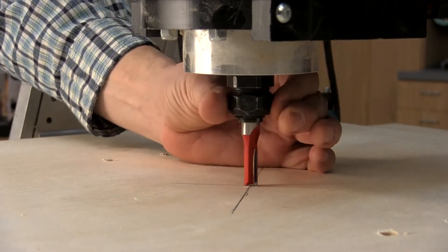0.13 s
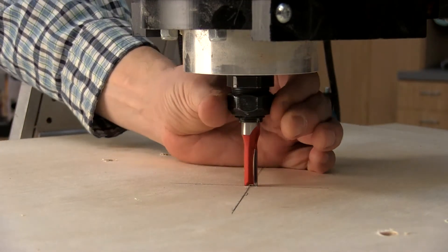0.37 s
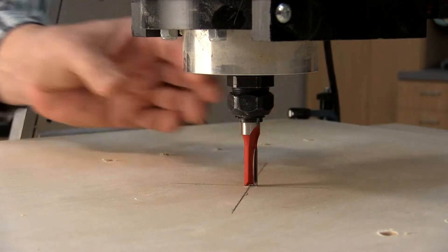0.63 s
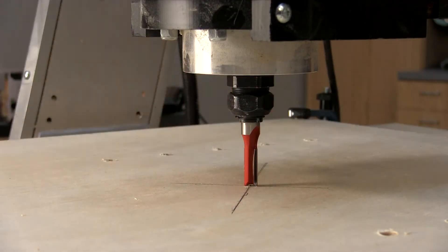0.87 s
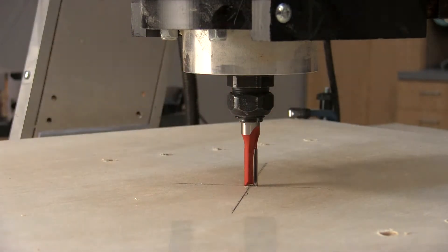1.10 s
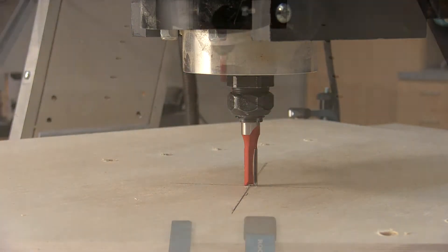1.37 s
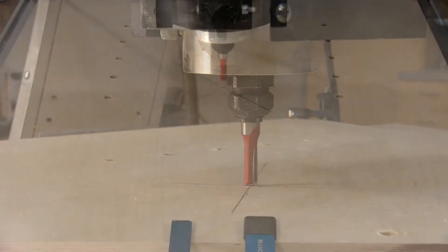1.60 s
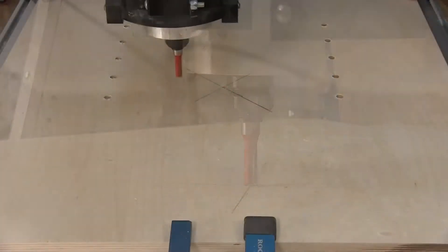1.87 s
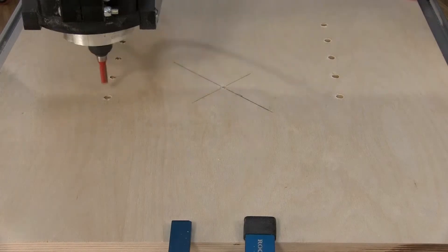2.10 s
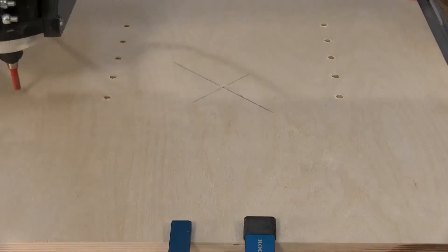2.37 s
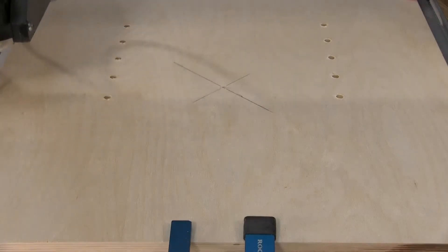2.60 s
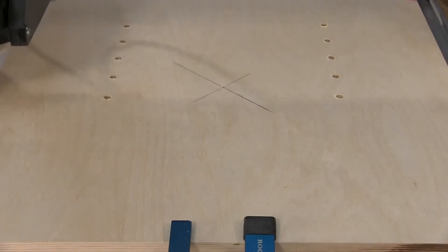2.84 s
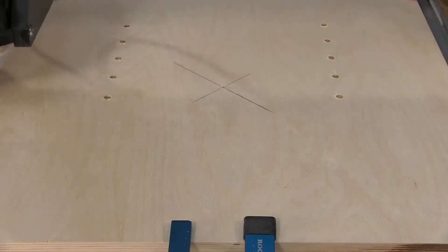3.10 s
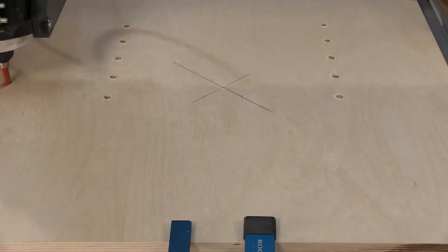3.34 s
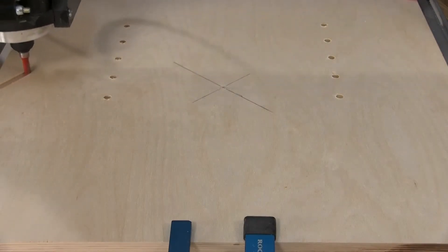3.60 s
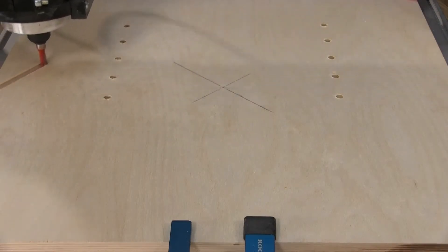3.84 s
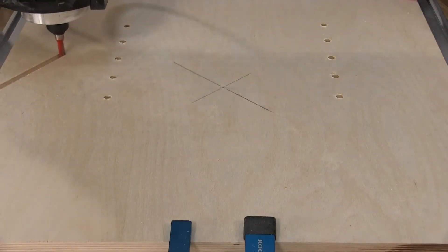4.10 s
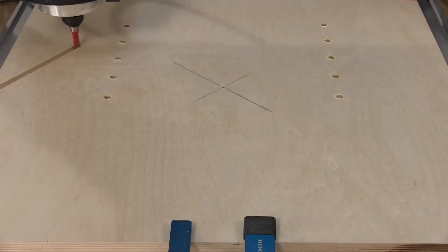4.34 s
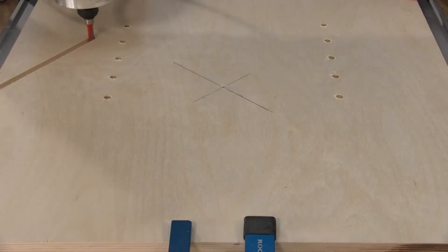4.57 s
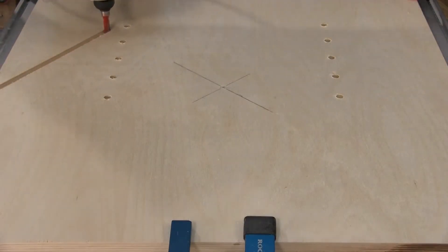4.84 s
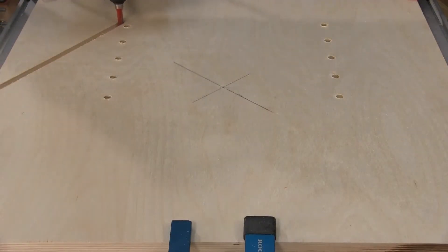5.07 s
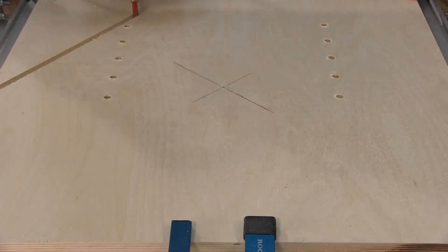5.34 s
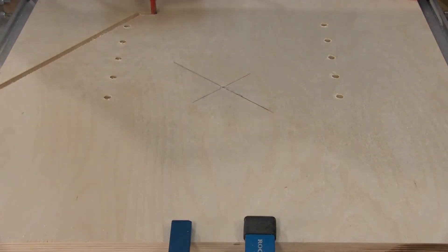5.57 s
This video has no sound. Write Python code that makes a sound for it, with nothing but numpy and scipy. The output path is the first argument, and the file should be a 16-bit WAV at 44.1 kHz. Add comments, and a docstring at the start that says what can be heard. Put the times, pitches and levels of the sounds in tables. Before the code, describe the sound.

For the first 1.55 s a workshop is nearly silent: low ventilation rumble, thin soft hiss, a faint 70 Hz hum until about 0.6 s, a tiny dry tick near 1.04 s and a weak low motor tone from 1.26 s. At 1.55 s the sound switches abruptly, with no spin-up, to a much louder router spindle: a steady piercing whine near 2.3 kHz with high overtones and airy cooling hiss. Brief stepper tones around 1 kHz sound between 1.6 and 2.5 s, others later. From 2.75 s the pitch sags, dropping faster as the bit bites plywood around 3.2 s, to about 1.7 kHz by 3.5 s. The cut is rough and dense, a metallic buzz with chip noise, throbbing near 205 Hz and a feed tone near 690 Hz, its colour shifting as the head travels. At 5.47 s one axis stops and the timbre becomes cleaner; the whine continues to the end. Close indoor stereo.

```python
"""A quiet workshop is heard first: rumble, hiss, faint hum and one tick; then the scene changes abruptly.
A router spindle, its overtones a bank of wavering sines, whines at full speed while stepper tones sound.
The bit enters plywood and the pitch sags; two feed vibrations put sidebands round the overtones.
Shaped noise makes the ventilation, cooling air and chips; jittered overtones add a dense buzz."""
import sys
import numpy as np
from scipy import signal
from scipy.fft import rfft, irfft, next_fast_len
from scipy.io import wavfile
from scipy.ndimage import uniform_filter1d

SR = 44100
rng = np.random.default_rng(int(sys.argv[2]) if len(sys.argv) > 2 else 0)


def gain_from_db(level_db):
    """Turn a decibel level (scalar or array-like) into a linear amplitude factor."""
    decades = np.asarray(level_db, float) / 20
    return 10 ** decades


def store_wav(level_fs):
    """Save 16-bit WAV to argv[1]."""
    pcm = np.round(np.clip(np.atleast_2d(level_fs), -1, 1) * 32767)
    wavfile.write(sys.argv[1], SR, pcm.T.astype(np.int16))


N = 251414  # samples
CUT, STOP = 1.5515, 5.47  # change of scene, slow axis stops (s)
END = 9  # a gate closing here (s) stays open to the last sample
LEFT_RIGHT = np.array([[1], [-1]])  # sign of the side signal at each microphone


def along(points, hz):
    """Gain at hz from (Hz, dB) points joined on a log frequency axis."""
    f, db = np.transpose(points)
    return gain_from_db(np.interp(np.log(hz + 1), np.log(f + 1), db))


def curves(rows):
    """One value per sample for each column after the time."""
    s, *columns = np.transpose(rows)
    t = np.arange(N) / SR
    return [np.interp(t, s, column) for column in columns]


def wobble(rate):
    """A random curve with rate knots a second."""
    knots = rng.standard_normal(int(N * rate / SR) + 4)
    return np.interp(np.arange(N) * (rate / SR), np.arange(len(knots)), knots)


def gate(start, stop, edge):
    """1 between two times, with ramps of edge seconds inside them."""
    t = np.arange(N) / SR
    return np.clip(np.minimum(t - start, stop - t) / edge, 0, 1)


def turns(hz):
    """Running phase of a changing frequency, in radians."""
    return 2 * np.pi * np.cumsum(hz * np.ones(N)) / SR


# The bass is nearly alike at both microphones.
# Each row: frequency in Hz, gain of the side signal in dB.
SIDE_COLOUR = [(70, -12), (300, -1.5)]


def rush(gain, side_db, patchy_db, source=None):
    """Colours a mid and side source (noise if none) with random patches of gain; its mid has rms 1."""
    if source is None:
        source = rng.standard_normal((2, N))
    hz, _, z = signal.stft(source, SR, nperseg=2048)
    field = rng.standard_normal(z.shape[1:])
    field = uniform_filter1d(uniform_filter1d(field, 14, axis=0), 3, axis=1)
    colour = gain(hz) * [np.ones_like(hz), along(SIDE_COLOUR, hz)]
    z = z * colour[..., None] * gain_from_db(patchy_db * field / field.std())
    mid, side = signal.istft(z, SR, nperseg=2048)[1][:, :N]
    return (mid + gain_from_db(side_db) * side * LEFT_RIGHT) / mid.std()


def line(phase, db, waver_db=2, spread=0.27):
    """A sine of rms db with wavering level; room paths shift its phase oppositely at each microphone."""
    lead = spread * wobble(3.7)
    size = np.sqrt(2) * gain_from_db(db + waver_db * (wobble(14) + 0.3 * wobble(4)))
    phase = phase + 2 * np.pi * rng.random() + 0.55 * wobble(40)
    return size * np.sin(phase + lead * LEFT_RIGHT)


# The empty room. Each row: time in seconds, rumble level in dB, hiss level in dB.
ROOM_LEVELS = [(0, -52.5, -66.5), (.62, -51.5, -64), (.7, -51, -62), (1.54, -50, -66)]
# Colour of the rumble. Each row: frequency in Hz, gain in dB.
RUMBLE_COLOUR = [(52, -48), (72, -12), (120, -2), (190, -5.5), (834, -8.5), (1930, -15), (2200, -19.5),
                 (3500, -41)]
# Colour of the hiss. Each row: frequency in Hz, gain in dB.
HISS_COLOUR = [(1500, -21), (2500, -2), (7800, -13.5), (13800, -14.5), (14300, -23)]
# Narrow noise bands of idle equipment. Each row: centre in Hz, width in Hz, relative power in dB.
IDLE_BANDS = [(850.5, 11, -62), (948, 21, -70), (1913, 97, -69.5), (10100, 530, -68), (9170, 980, -77.5),
              (13100, 390, -77.5)]
# The small tick. Each row: start in seconds, starting level in dB before random shaping.
TICKS = [(1.0358, -46.5)]


def workshop():
    """Ventilation rumble and hiss as coloured noise, idle equipment as narrow bands, and a decaying tick."""
    rumble_db, hiss_db = curves(ROOM_LEVELS)

    def idle_gain(hz):
        power = sum(gain_from_db(2 * db) / width / (1 + (2 * (hz - centre) / width) ** 2) ** 2
                    for centre, width, db in IDLE_BANDS)
        return np.sqrt(power)

    out = gain_from_db(rumble_db) * rush(lambda hz: along(RUMBLE_COLOUR, hz), side_db=-6.5, patchy_db=0.3)
    out += gain_from_db(hiss_db) * rush(lambda hz: along(HISS_COLOUR, hz), side_db=-5.5, patchy_db=2.3)
    out += gain_from_db(-58) * rush(idle_gain, side_db=-6, patchy_db=1.3)
    t = np.arange(800) / SR
    for start, db in TICKS:
        decay = gain_from_db(db - 60 * t / 0.026)  # 60 dB in 26 ms
        rough = 3 * uniform_filter1d(rng.standard_normal(800), size=16)
        out[:, round(start * SR):][:, :800] += decay * np.sin(2 * np.pi * 3800 * t) * rough
    return out * gain_from_db([[-0.6], [0.6]])  # slightly stronger at the right microphone


# Steady tones. Each row: start in seconds, stop in seconds, pitch in Hz, level in dB,
# fall over the tone in dB (negative rises).
MOTOR_TONES = [(0, 0.595, 70, -60, 3), (1.258, 1.533, 186.7, -56.5, -0.5), (1.623, 1.67, 977, -50, 20),
               (1.748, 1.81, 974, -47, 30), (1.876, 2.487, 991, -55, 8), (1.885, 2.48, 894, -63, 2),
               (2.1, 2.6, 670, -80, -9), (2.611, 2.732, 677, -59, 4), (2.817, 3.14, 1070, -69, -8),
               (3.13, 3.19, 920, -67, 0), (3.18, 3.46, 1655, -63, 0), (3.18, 3.5, 1135, -70, 2)]


def motors():
    """Stepper and mains tones: wavering sines of fixed pitch that start and stop."""
    out = 0
    for start, stop, hz, db, fall_db in MOTOR_TONES:
        level_db = db - fall_db * gate(start, END, stop - start)
        tone = line(turns(hz), level_db, waver_db=2, spread=0.08)
        out = out + tone * gate(start, stop + 0.0082, 0.0085)
    return out


# Air and chip noise. Each row: time in seconds, level in dB.
AIR_LEVEL = [(1.55, -36), (1.9, -34.5), (2.0, -37), (3.14, -35), (3.22, -39), (3.45, -39.5), (4.2, -38),
             (4.9, -37.5), (5.44, -36), (5.5, -37.5)]
# Height of the head. Each row: time in seconds, state (0 raised, 1 lowered to the sheet, 2 cutting).
HEAD_STATE = [(1.8, 0), (2.5, 0.86), (3.15, 0.87), (3.4, 1.7)]
# Colour of the air with the head raised. Each row: frequency in Hz, gain in dB.
FREE_COLOUR = [(3000, -18.5), (4100, -6), (5000, -17.5), (5800, -1.5), (6700, -5.5), (7600, -18.5),
               (11000, -16), (15700, -14)]
# The same with the head lowered. Each row: frequency in Hz, gain in dB.
LOWERED_COLOUR = [(3000, -16.5), (4400, -1.5), (5200, -10.5), (6300, -0.5), (7200, -11), (9000, -15),
                  (11000, -14.5), (15700, -15.5)]
# The same in the cut, also used by the buzz. Each row: frequency in Hz, gain in dB.
CUTTING_COLOUR = [(2500, -11), (4200, 0.5), (6000, -6.5), (7200, 1), (8700, 1), (9700, -2), (10200, -1.5),
                  (10900, -14), (12900, -1.5), (14000, -10.5), (15700, -4.5)]
# Steep loss of bass in the router noise, air and buzz alike. Each row: frequency in Hz, gain in dB.
BASS_LOSS = [(40, -34.5), (300, -30), (600, -17), (1300, -11.5), (2300, 0)]
# Vibration of the slow feed axis. Each row: time in seconds, rate in Hz.
SLOW_AXIS = [(3.8, 209), (4.5, 205), (5.4, 204)]


def air():
    """Cooling air and chips: noise coloured by the head's height, throbbing at the slow axis rate."""
    (level_db,), (state,), (slow_hz,) = curves(AIR_LEVEL), curves(HEAD_STATE), curves(SLOW_AXIS)
    throb = 1 + 0.5 * gate(3.3, STOP, 0.055) * np.sin(turns(slow_hz))
    noise = 0
    for k, colour in enumerate((FREE_COLOUR, LOWERED_COLOUR, CUTTING_COLOUR)):
        share = np.sqrt(np.clip(1 - abs(state - k), 0, 1))
        source = throb * rng.standard_normal((2, N))
        noise = noise + share * rush(lambda hz: along(colour, hz) * along(BASS_LOSS, hz),
                                     side_db=-13, patchy_db=1.7, source=source)
    return noise * gain_from_db(level_db + 0.79 * wobble(9))


def buzz(spin, fast, slow, slow_depth):
    """Both axes jitter the overtones in time, filling the spectrum with a dense comb of weak lines."""
    start = 2 * np.pi * rng.random((10, 3, 2, 1))  # overtone, phase, mid or side
    comb = 0
    for k, (a, b, c) in enumerate(start):
        jitter = 1.5 * np.sin(fast + b) + 2.22 * slow_depth * np.sin(slow + c)  # radians
        comb = comb + np.sin(k * spin + a + jitter)
    return rush(lambda hz: along(CUTTING_COLOUR, hz) * along(BASS_LOSS, hz),
                side_db=-8, patchy_db=4.5, source=comb)


# How loudly a spindle line arrives with the head raised. Each row: pitch in Hz, level in dB.
RAISED_ARRIVAL = [(2330, -52.5), (4650, -56.5), (7000, -42.5), (9300, -55), (11600, -66), (14000, -63)]
# The same with the head down on the resonating sheet.
# Each row: pitch in Hz, level in dB at the near edge, level in dB far across.
SHEET_ARRIVAL = [(990, -58, -56), (1400, -75, -58), (1656, -56, -59.5), (1664.5, -61, -49.5),
                 (2128, -48, -72.5), (2130, -64, -65), (2390, -53.5, -56.5), (2860, -59, -50),
                 (3220, -66, -62), (3290, -50, -59.5), (3395, -45, -54.5), (3500, -43, -60),
                 (3545, -44.5, -42), (3840, -64, -48), (4040, -57, -44), (4120, -51, -48), (4210, -50, -57),
                 (4750, -46.5, -48.5), (4950, -53.5, -52), (5230, -47, -41), (5670, -45.5, -51.5),
                 (6100, -45, -68), (6500, -54, -51), (6860, -53, -62), (6930, -60, -38.5), (7590, -53, -56),
                 (8800, -45, -36.5), (9120, -51, -54), (9000, -51.5, -55), (10000, -58, -60),
                 (10450, -59, -56), (12700, -58, -68), (15000, -41, -68)]


def arrival_db(hz, place):
    """Level of a line at a changing pitch, blended between the three places of the head."""
    free_hz, free_db = np.transpose(RAISED_ARRIVAL)
    sheet_hz, near_db, far_db = np.transpose(SHEET_ARRIVAL)
    across, raised = np.clip(place - 1, 0, 1), np.clip(1 - place, 0, 1)
    down_db = np.interp(hz, sheet_hz, near_db) + across * np.interp(hz, sheet_hz, far_db - near_db)
    return down_db + raised * (np.interp(hz, free_hz, free_db) - down_db)


# Strength of each overtone at the spindle, from the first up [dB].
OVERTONE_DB = [-1, 4, 1.5, 2.5, -1.5, -2, -10]
# Change of each overtone once the slow axis stops [dB].
STOPPED_DB = [-3, 2.5, -6, 12.5, -5, 8, 0]


def overtones(pitch_hz, spin, place, cutting, stopped):
    """Whole multiples of the spindle pitch; they swell in the plunge and drop slightly in the cut."""
    work_db = -1 * cutting + 2.5 * gate(2.73, 3.47, 0.13)
    out = 0
    for k, (db, stop_db) in enumerate(zip(OVERTONE_DB, STOPPED_DB), 1):
        level_db = db + arrival_db(k * pitch_hz, place) + work_db + stop_db * stopped
        out = out + line(k * spin, level_db)
    return out


def feed_tones(fast, slow, fast_db, cutting, both):
    """The fast axis heard by itself, with two weak combination tones while both axes move."""
    out = line(fast, fast_db, waver_db=1.2, spread=0.2)
    out += line(fast + slow, -71) * both
    out += line(2 * fast - slow, -75) * both
    return out * cutting


# Sidebands. Each row: times the fast axis rate, times the slow axis rate.
SIDEBAND_OFFSETS = [(1, 0), (-1, 0), (2, 0), (0, 1), (0, -1), (0, 2), (1, 1)]
# Each sideband relative to its overtone, before the bite lifts it [dB].
SIDEBAND_DB = [-1.5, -13.5, -8.5, -8.5, -12, -13.5, -16.5]
# Change of the three fast sidebands once the slow axis stops [dB].
ALONE_DB = [2, 9, 0]


def sidebands(pitch_hz, fast_hz, slow_hz, spin, fast, slow, place, cutting, both, stopped, bite):
    """Sums and differences of overtone and feed rates, coloured by the sheet at their own pitch."""
    alone = list(ALONE_DB) + [0] * 4
    out = 0
    for k, db in enumerate(OVERTONE_DB[:-1], 1):
        for (m, n), under_db, alone_db in zip(SIDEBAND_OFFSETS, SIDEBAND_DB, alone):
            hz = k * pitch_hz + m * fast_hz + n * slow_hz
            level_db = db + under_db + 4.5 * bite + alone_db * stopped + arrival_db(hz, place)
            moving = both if n else cutting
            out = out + line(k * spin + m * fast + n * slow, level_db) * moving
    return out


# Pairs of lines 150 Hz either side of the free-running whine. Each row: overtone, level in dB.
BESIDE_LINES = [(2, -52.5), (3, -56), (4, -63)]


def lines_beside(spin):
    """A line above and below some overtones before the plunge."""
    out = 0
    for k, db in BESIDE_LINES:
        for sign in (1, -1):
            out = out + line(k * spin + sign * turns(150), db) * gate(1.5, 2.8, 0.042)
    return out


# Half orders as the bit plunges. Each row: multiple of the spindle pitch, level in dB.
HALF_ORDERS = [(1.5, -61), (2.5, -55)]


def half_orders(spin):
    """Lines midway between overtones, until the cut begins."""
    return sum(line(order * spin, db, waver_db=3) * gate(2.0, 3.18, 0.08) for order, db in HALF_ORDERS)


# Pitch of the spindle whine. Each row: time in seconds, pitch in Hz.
SPINDLE_PITCH = [(1.55, 2328), (2.73, 2329), (2.87, 2214), (2.93, 2183), (3.14, 2108), (3.17, 2071),
                 (3.2, 1990), (3.29, 1830), (3.4, 1744), (3.59, 1683), (3.86, 1677), (4.04, 1657),
                 (4.3, 1662), (4.76, 1648), (5.1, 1670), (5.4, 1677), (5.48, 1672), (5.7, 1690)]
# Travel of the head. Each row: time in seconds, place (0 raised, 1 down at the near edge, 2 far across).
HEAD_TRAVEL = [(2.2, 0.072), (2.85, 0.41), (3.85, 1.23), (4.02, 1.55), (4.8, 2.05)]
# Feed in the cut. Each row: time in seconds, fast axis rate in Hz, level of its tone in dB.
FAST_AXIS = [(3.2, 715, -71), (3.28, 687, -52), (3.32, 669, -57.5), (3.5, 666.2, -63.5),
             (4.0, 686.3, -59.5), (4.34, 690, -60.5), (4.87, 685.5, -57), (5.4, 700, -65.5),
             (5.49, 688, -56.5)]
# Brief dips of the whine. Each row: start in seconds, stop in seconds, change in dB.
DIPS = [(2.75, 2.84, -7), (4.13, 4.15, -6.5)]


def whine():
    """The spindle's lines and buzz, all following its pitch and the vibrations of the two feed axes."""
    (pitch_hz,), (place,) = curves(SPINDLE_PITCH), curves(HEAD_TRAVEL)
    (fast_hz, fast_db), (slow_hz,) = curves(FAST_AXIS), curves(SLOW_AXIS)
    spin, fast, slow = turns(pitch_hz), turns(fast_hz), turns(slow_hz)
    cutting = gate(3.18, END, 0.038)
    both = gate(3.25, STOP, 0.0095) * gate(3.1, END, 0.35)  # both axes moving
    stopped = gate(STOP, END, 0.0223)
    bite = gate(0, 3.5, 0.14)  # its end fades the extra strength of the first bite
    out = overtones(pitch_hz, spin, place, cutting, stopped)
    out += feed_tones(fast, slow, fast_db, cutting, both)
    out += gain_from_db(-45.5 + 3 * bite) * buzz(spin, fast, slow, both) * cutting
    out += sidebands(pitch_hz, fast_hz, slow_hz, spin, fast, slow, place, cutting, both, stopped, bite)
    out += lines_beside(spin)
    out += half_orders(spin)
    return out * gain_from_db(sum(db * gate(start, stop, 0.0067) for start, stop, db in DIPS))


# Position of the router. Each row: time in seconds, left over right in dB.
ROUTER_PAN = [(1.55, -0.3), (2.7, 2.5), (5.7, 0.5)]
# Router and motors differ least between microphones in the low mids and the top treble.
# Each row: frequency in Hz, gain of the side signal in dB.
ROUTER_WIDTH = [(300, 5.5), (500, -8), (2800, -7), (3200, 3.5), (13500, 5.5), (15300, -8)]


def scene():
    """The workshop, then the router panned by its position; motor tones sound in both."""
    pan_db, = curves(ROUTER_PAN)
    router = (whine() + air()) * gate(CUT, END, 0.0023)
    left, right = router * gain_from_db([pan_db / 2, -pan_db / 2]) + motors()
    size = next_fast_len(N + 8192)
    width = along(ROUTER_WIDTH, np.fft.rfftfreq(size, 1 / SR))
    side = irfft(rfft(left - right, size) * width, size)[:N]
    machine = (left + right + side * LEFT_RIGHT) / 2
    return workshop() * gate(-1, CUT + 0.0052, 0.0048) + machine


def roll_off(x):
    """The treble ends steeply here."""
    return signal.sosfilt(signal.butter(12, 16970, fs=SR, output="sos"), x)


def record(dry):
    """Removes everything from 15750 Hz up and finishes the mix."""
    size = next_fast_len(N)
    passed = np.fft.rfftfreq(size, 1 / SR) < 15750
    narrow = irfft(rfft(dry, size) * passed, size)[:, :N]
    return roll_off(narrow)


dry = scene()
out = record(dry)
store_wav(out)
```